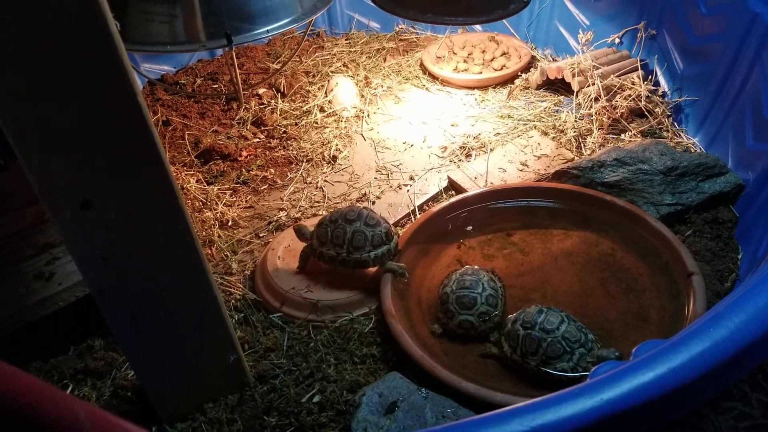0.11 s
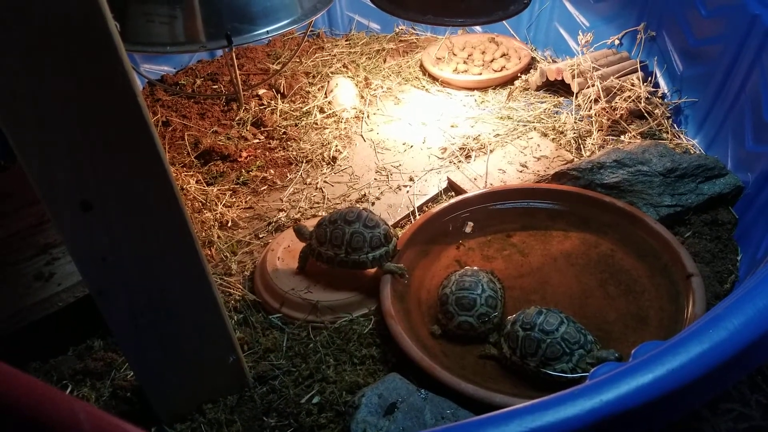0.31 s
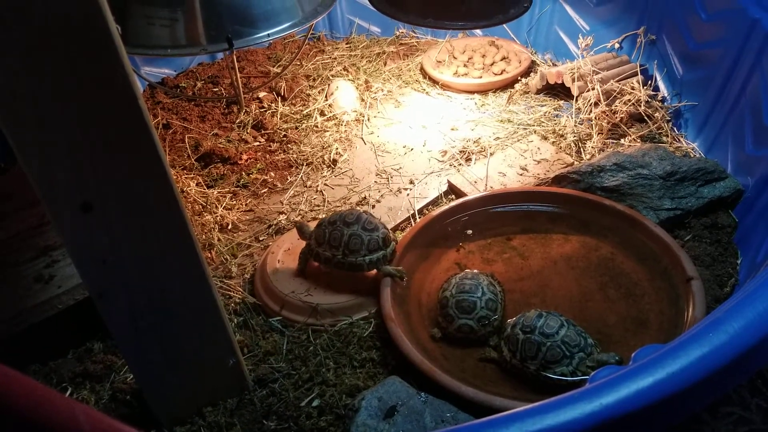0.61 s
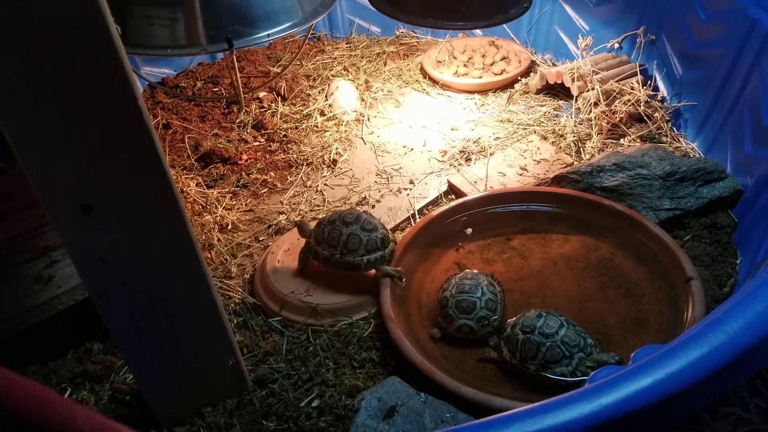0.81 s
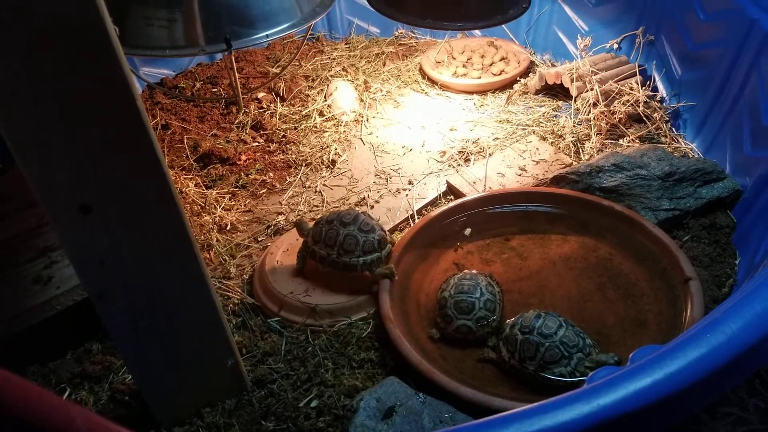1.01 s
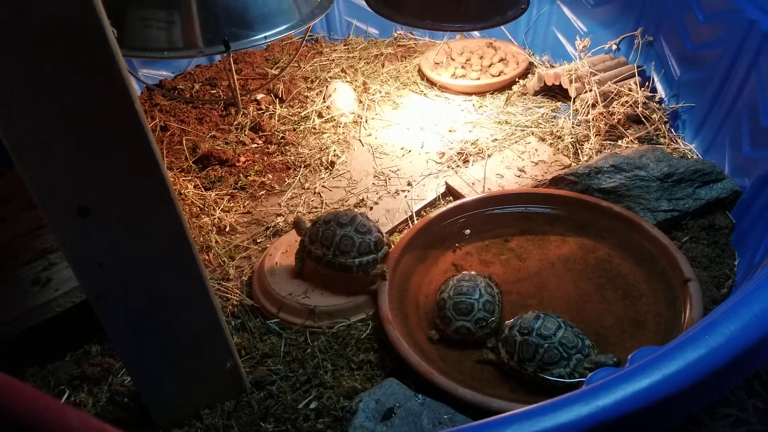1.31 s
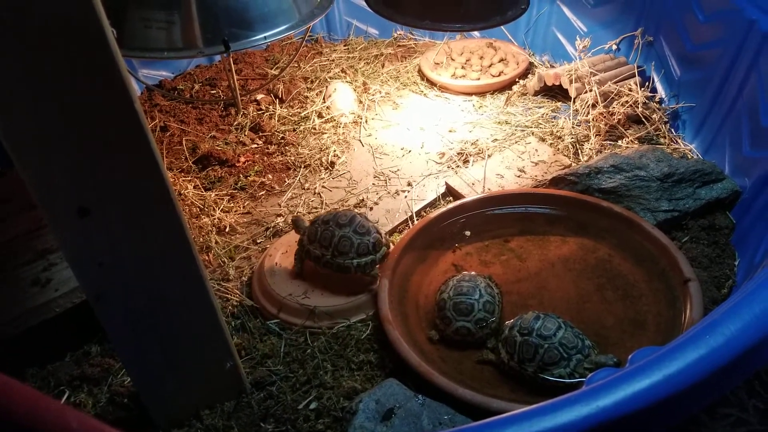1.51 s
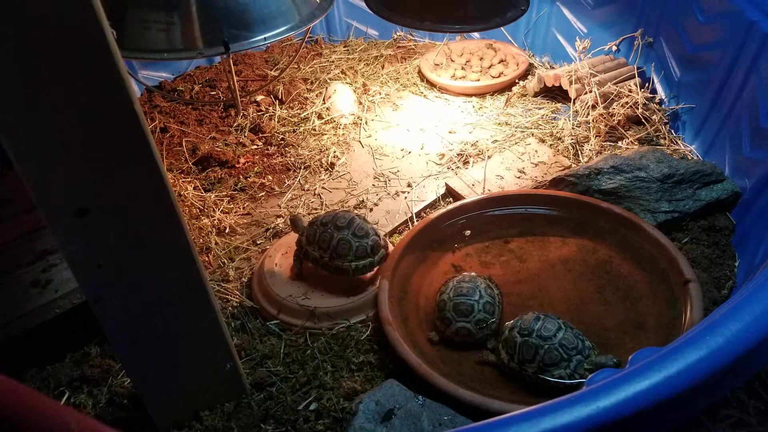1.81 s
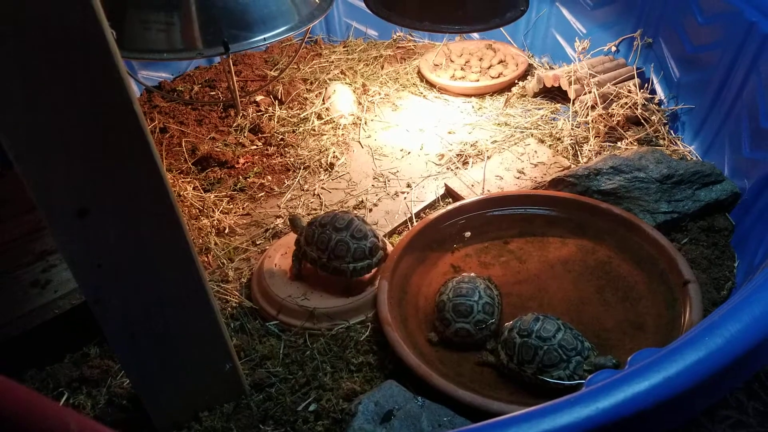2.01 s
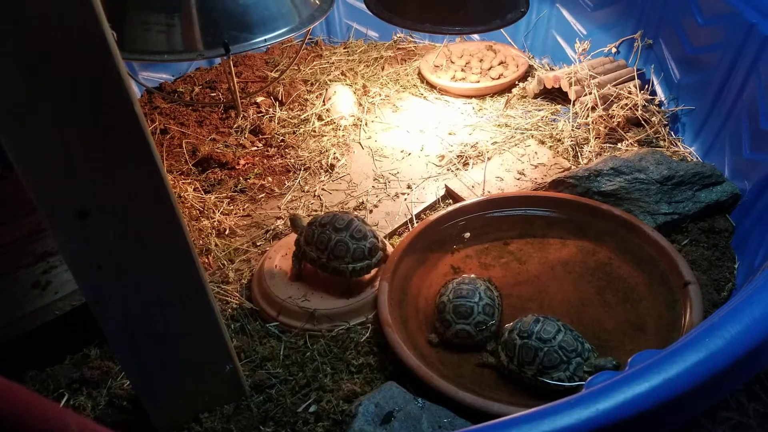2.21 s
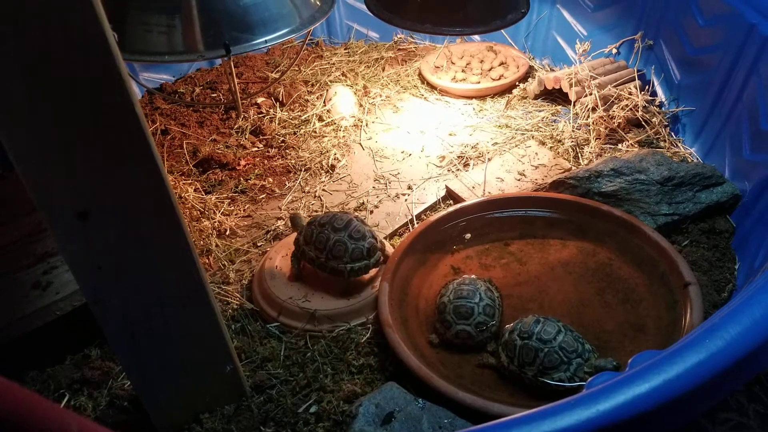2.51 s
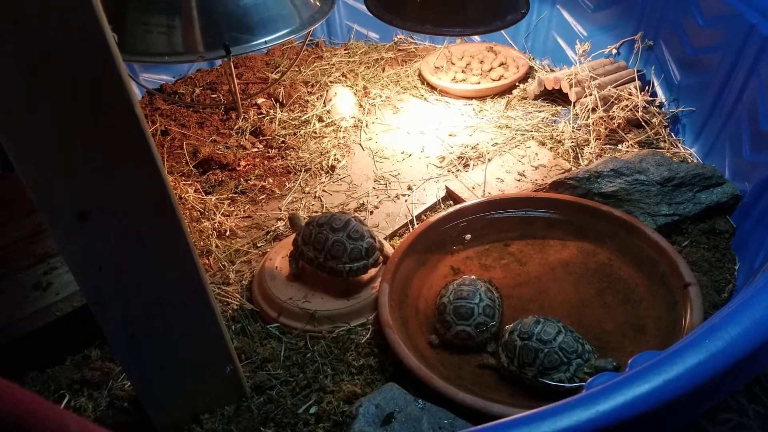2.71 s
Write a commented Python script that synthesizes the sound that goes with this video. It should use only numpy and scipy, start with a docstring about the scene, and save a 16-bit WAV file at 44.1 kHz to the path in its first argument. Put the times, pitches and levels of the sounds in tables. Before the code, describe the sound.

A firm hollow dish knock comes early, another at one second, then a scuffing slip and deep plastic-tub boom, followed by dull fading bumps; faint claw rustle, low room rumble, close stereo microphone.

```python
"""Small tortoises clamber over clay dishes in a plastic tub, inside a small hard room with a low rumble, in stereo.
From the start claws rustle faintly in the dry bedding: coloured noise that swells and dies with each stroke.
Then shells tip dishes, to the left: a short low push, its low resonances, and a hollow ring of decaying modes
amid noise reflections. Past the middle a shell slips with a bright scuff of noise and the tub booms in low modes;
more knocks follow, softer than the first."""
import sys
import numpy as np
from scipy import signal
from scipy.fft import rfft, irfft
from scipy.io import wavfile

SR = 44100
rng = np.random.default_rng(int(sys.argv[2]) if len(sys.argv) > 2 else 0)


def waveform_to_disk(signal):
    """Save audio, clipped to [-1, 1], as 16-bit WAV at the path in sys.argv[1]."""
    frames = np.transpose(np.atleast_2d(signal))
    scaled = np.clip(frames, -1, 1) * 32767
    samples = np.round(scaled).astype(np.int16)
    wavfile.write(sys.argv[1], SR, samples)


N = 125685

# Knocks of shell on dish: (time [s], thump gain [dB], ring gain [dB],
# contact cut-off [Hz], low = soft, gain of the hard edge of the contact [dB])
KNOCKS = [(0.236, -6.5, 1, 2146, -14), (0.640, -44.5, -54, 306, -47.5), (1.029, -10.5, -7.5, 1355, -17.5),
          (1.6041, -14.5, -6.5, 755, -30.5), (1.633, -28.5, -9.5, 515, -23), (1.988, -27.5, -9, 680, -32),
          (2.009, -28, -24, 660, -30.5), (2.3064, -22, -14, 410, -42), (2.5552, -23, -14, 399, -33),
          (2.7466, -25.5, -16, 340, -48)]
# Low resonances of tub and room that answer a thump: (frequency [Hz], level before the knock's gain [dB], t60 [s])
LOW_MODES = [(77.44, -16.5, 0.36), (109.5, -14.5, 0.35), (127.1, -19.5, 0.4), (148, -20.5, 0.47),
             (180.85, -15.5, 0.3), (204.1, -20.5, .38)]
# Ring of the dish: (frequency [Hz], level before the knock's gain [dB], t60 [s])
DISH_MODES = [(227, -30.5, 0.35), (252.6, -26, 0.35), (270, -27.5, .36), (301.7, -33, .32),
              (342.4, -33.5, 0.35), (489.5, -35.5, 0.26), (522.3, -29, .32), (547.6, -35.5, .3),
              (591.6, -28, 0.28), (712.3, -32, 0.26), (802, -32.5, .32), (929, -36, .27),
              (993, -35.5, 0.24), (1171, -37, 0.31), (1260, -36.5, 0.23), (1465, -39.5, 0.24),
              (1488, -38, .27), (1600, -40.5, 0.14), (2116, -50, .44), (2748, -52.5, .48)]
# Dense resonances and reflections of a knock, strongest in the low and low-middle range:
# (frequency [Hz], relative density [dB per Hz])
CLATTER_COLOUR = [(45, -33.5), (90, -9.5), (170, 3.5), (280, -0.5), (400, -9.5), (570, 1.5), (665, -7.5),
                  (780, -7), (1050, -11), (1350, -13), (1600, -16.5), (2200, -27), (3200, -39), (6000, -43),
                  (9000, -59.5)]
# Bright scuff of a slipping shell: (frequency [Hz], relative density [dB per Hz])
SCUFF_COLOUR = [(40, -1.5), (90, 20.5), (170, 19), (400, 7), (600, 5.5), (1000, -2.5), (1600, -5),
                (2600, -9.5), (3400, -15), (4500, -11.5), (6400, -12.5), (8500, -28.5), (12000, -23),
                (15500, -29.5)]
# Boom of the tub as the weight lands on it: (frequency [Hz], level [dB], t60 [s])
BOOM_MODES = [(61.84, -16, 0.53), (120.8, -24.5, 0.41), (143.7, -29.5, 0.63), (167.6, -25.5, 0.38),
              (198.4, -32, 0.35), (248.6, -37.5, 0.4)]
# Strokes of claws in the bedding: (time [s], level [dB], rise [s], t60 [s])
RUSTLES = [(-0.02, -66.5, 0.016, 0.57), (0.095, -59, 0.096, 0.46), (0.55, -71.5, 0.061, 0.83),
           (0.693, -65, .012, 0.54), (1.257, -75, 0.0046, 0.41), (2.133, -67, .02, 0.27)]
# Colour of the dry bedding: (frequency [Hz], relative density [dB per Hz])
RUSTLE_COLOUR = [(500, 3), (1100, -4.5), (1500, -3), (2800, -2), (3600, -11.5), (6200, -2.5), (8400, -21),
                 (12000, -8.5), (15500, -7.5)]
# Room rumble and hiss: (frequency [Hz], relative density [dB per Hz])
ROOM_COLOUR = [(20, -12), (45, 0.5), (70, 4.5), (130, -3.5), (180, -16), (270, -14), (400, -31),
               (600, -32.5), (1000, -40.5), (3200, -49), (5000, -46.5), (6700, -49.5), (8600, -67.5),
               (12000, -46), (15500, -45)]
# Stereo placing: (frequency [Hz], left over right [dB])
BALANCE = [(60, 3.5), (200, 2), (400, 4), (700, 3.5), (1300, 5.5), (2400, 4.5), (4400, 8.5), (8000, 7),
           (15000, 0)]
# Stereo width of the noises: (frequency [Hz], side over mid [dB])
WIDTH = [(100, -22.5), (220, -10.5), (400, -10), (700, -4.5), (1300, 1), (15000, -0.5)]

T = np.arange(N) / SR
HZ = np.fft.rfftfreq(N, 1 / SR)
SIDES = np.array([[1], [-1]])  # left, right

# Rises are time constants; each T60 of a noise tail holds at 1 kHz, and damping is its octaves lost per octave up.
THUMP_HZ, THUMP_PEAK_S, THUMP_WIDTH_S, THUMP_PAN_DB = 148, 0.009, 0.0069, 4
LOW_DELAY_S, LOW_RISE_S = 0.01368, 0.0088
RING_RISE_S, MODE_SPREAD_HZ, STRIKE_SCATTER_DB = 0.014, 1000, 3
CLATTER_DB, CLATTER_RISE_S, CLATTER_T60_S, CLATTER_DAMPING = -20, 0.024, 0.33, 0.15
EDGE_HZ, EDGE_DELAY_S = 1120, 0.01
SNAP_DB, SNAP_HZ, SNAP_RISE_S, SNAP_T60_S = -35, 3500, 0.0012, 0.091
SCUFF_S, SCUFF_DB, SCUFF_RISE_S, SCUFF_T60_S, SCUFF_DAMPING = 1.665, -25.5, 0.029, 0.49, 0.27
BOOM_S, BOOM_RISE_S = 1.722, 0.014
RING_DIRECT = 0.17  # share of the room's answer that is there from the first instant
TAIL_ONSET_S = 0.00069
ROOM_DB = -54
LOW_CUT_HZ, TOP_HZ = 17, 15800


def knocks():
    """Every knock thumps and rings the same dish at a new spot; softer contacts leave out the upper part."""
    low = thump()
    modes = ring(DISH_MODES, RING_RISE_S)
    clatter = undb(CLATTER_DB) * tail(CLATTER_COLOUR, CLATTER_RISE_S, CLATTER_T60_S, CLATTER_DAMPING)
    out = np.zeros((2, N))
    for start_s, thump_db, ring_db, contact_hz, edge_db in KNOCKS:
        spot = undb(STRIKE_SCATTER_DB * rng.standard_normal(len(DISH_MODES)))
        body = np.tensordot(spot, modes, axes=1) + clatter
        hollow = cut(body, contact_hz, "low", order=4)
        # the brightest part arrives by way of the walls
        edge = at(EDGE_DELAY_S, cut(body, EDGE_HZ, "high", order=2))
        knock = undb(thump_db) * low + undb(ring_db) * hollow + undb(edge_db) * edge
        out += at(start_s, knock)
    return out


def thump():
    """A brief push on the base, answered a moment later by the low resonances."""
    late = T - THUMP_PEAK_S
    bell = np.exp(-(late / THUMP_WIDTH_S) ** 2)
    onset = 1 - np.exp(-T / 0.001)
    push = -np.cos(2 * np.pi * THUMP_HZ * late) * bell * onset
    answer = ring(LOW_MODES, LOW_RISE_S).sum(axis=0)
    return push * undb(SIDES * THUMP_PAN_DB / 2) + at(LOW_DELAY_S, answer)


def slip():
    """A shell slips with a snap and a bright scuff whose treble dies first, then the tub booms."""
    snap = cut(noise(SCUFF_COLOUR), SNAP_HZ, "high", order=1) * swell(SNAP_RISE_S, SNAP_T60_S)
    scuff = tail(SCUFF_COLOUR, SCUFF_RISE_S, SCUFF_T60_S, SCUFF_DAMPING)
    # a second rise softens the landing further
    boom = ring(BOOM_MODES, BOOM_RISE_S).sum(axis=0) * (1 - np.exp(-T / BOOM_RISE_S))
    return at(SCUFF_S, undb(SNAP_DB) * snap + undb(SCUFF_DB) * scuff) + at(BOOM_S, boom)


def bedding():
    """Faint strokes of claws: one steady noise of dry bedding, made audible by the effort of each stroke."""
    effort = np.zeros((1, N))
    for start_s, db, rise_s, t60_s in RUSTLES:
        effort += at(start_s, undb(db) * swell(rise_s, t60_s)[None])
    return noise(RUSTLE_COLOUR) * effort


def room():
    """Steady noise, strongest in the bass: the room's rumble with a little hiss."""
    return undb(ROOM_DB) * noise(ROOM_COLOUR)


def ring(modes, rise_s):
    """One stereo decay for each mode; the higher ones reach the two ears out of step."""
    out = []
    for k, (hz, db, t60_s) in enumerate(modes):
        apart = (-1) ** k * np.pi / 4 * min(hz / MODE_SPREAD_HZ, 1)
        phase = 2 * np.pi * (hz * T + rng.random()) + SIDES * apart
        out.append(undb(db) * pan(hz) * swell(rise_s, t60_s) * np.sin(phase))
    return np.array(out)


def tail(colour, rise_s, t60_s, damping):
    """A burst of noise in the room, in overlapping bands two octaves apart; higher bands die sooner."""
    spectrum = rfft(noise(colour))
    octave = np.log2(np.clip(HZ, 250, 16000) / 1000)  # from 1 kHz
    out = np.zeros((2, N))
    for k in range(-2, 5, 2):
        band = irfft(spectrum * np.maximum(1 - abs(octave - k) / 2, 0), N)
        out += band * swell(rise_s, t60_s * 2 ** (-k * damping), RING_DIRECT)
    return out * (1 - np.exp(-T / TAIL_ONSET_S))


def noise(colour):
    """Stereo noise of a given colour, mid rms 1 before panning, broadly wider towards the treble."""
    mid, side = np.exp(2j * np.pi * rng.random((2, len(HZ)))) * gain_at(colour, HZ)
    stereo = mid + SIDES * side * gain_at(WIDTH, HZ)
    return irfft(stereo * pan(HZ), N) / irfft(mid, N).std()


def swell(rise_s, t60_s, direct=0):
    """Starts at a share of its size, builds up, then dies away by 60 dB in each t60."""
    build = 1 - (1 - direct) * np.exp(-T / rise_s)
    return build * np.exp(-np.log(1000) * T / t60_s)


def pan(hz):
    """Left and right gains: the dishes lie to the left."""
    return gain_at(BALANCE, hz) ** (SIDES / 2)


def gain_at(points, hz):
    """Gain read from a (frequency [Hz], level [dB]) table on a log-frequency axis."""
    f, db = np.array(points).T
    return undb(np.interp(np.log(hz + 1e-9), np.log(f), db))


def undb(db):
    """Decibels to amplitude gain."""
    return 10 ** (np.asarray(db) / 20)


def at(start_s, x):
    """The sound x started at a given time; a negative time drops its beginning."""
    k = int(round(start_s * SR))
    late, early = max(k, 0), max(-k, 0)
    return np.pad(x, ((0, 0), (late, early)))[:, early:][:, :N]


def cut(x, hz, kind, order):
    """Butterworth low- or high-pass."""
    return signal.sosfilt(signal.butter(order, hz, kind, fs=SR, output="sos"), x)


def scene():
    """Knocks, the slip and the rustling over the room's rumble."""
    return knocks() + slip() + bedding() + room()


def record(dry):
    """The stereo recorder thins the deepest bass and cuts the top steeply."""
    thinned = cut(dry, LOW_CUT_HZ, "high", order=2)
    top_cut = signal.ellip(10, 0.2, 80, TOP_HZ, fs=SR, output="sos")
    return signal.sosfilt(top_cut, thinned)


dry = scene()
out = record(dry)
waveform_to_disk(out)
```